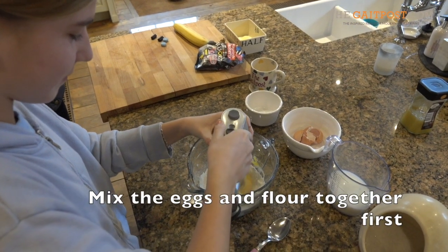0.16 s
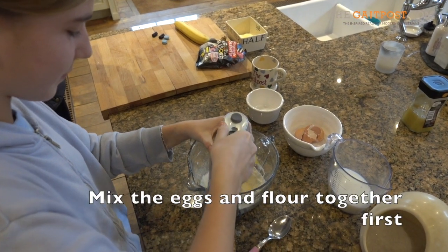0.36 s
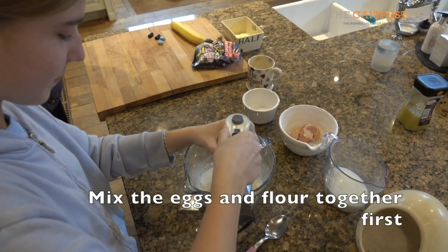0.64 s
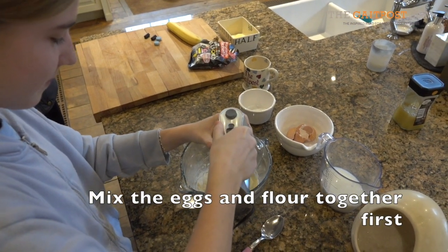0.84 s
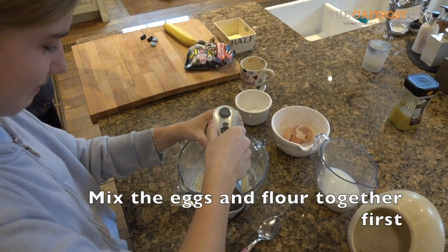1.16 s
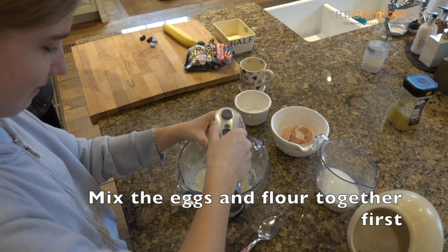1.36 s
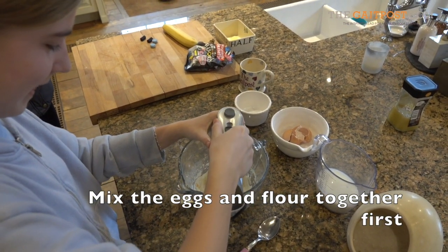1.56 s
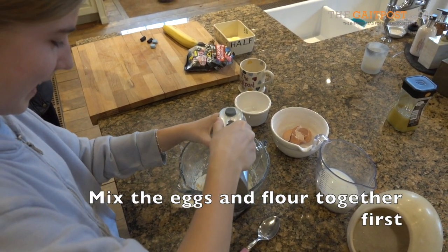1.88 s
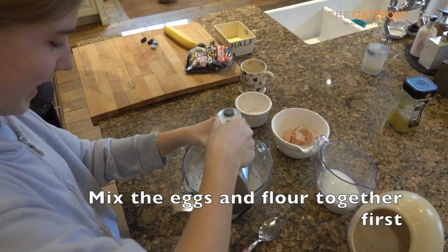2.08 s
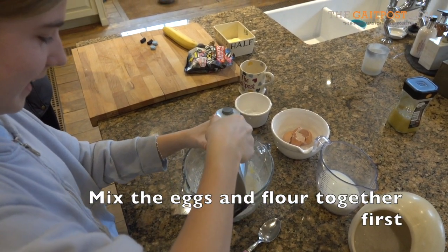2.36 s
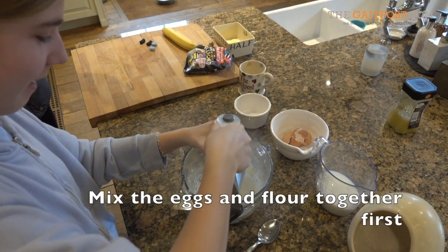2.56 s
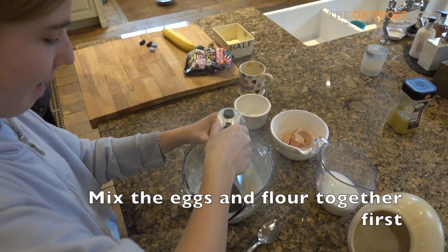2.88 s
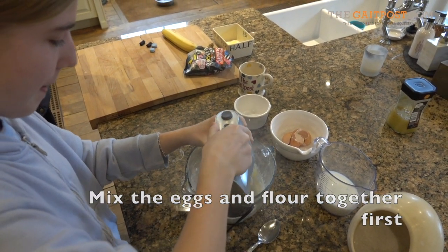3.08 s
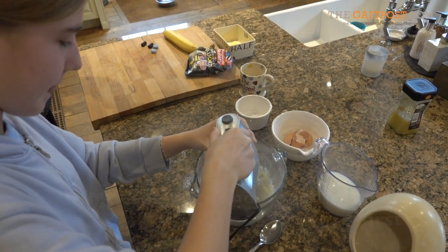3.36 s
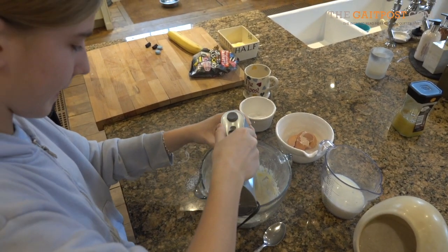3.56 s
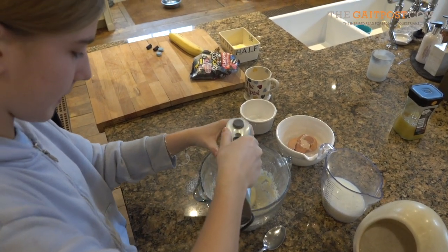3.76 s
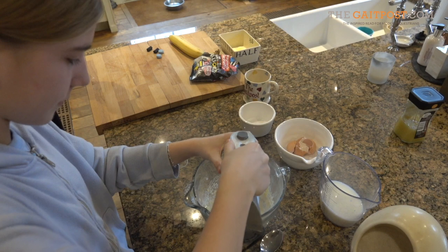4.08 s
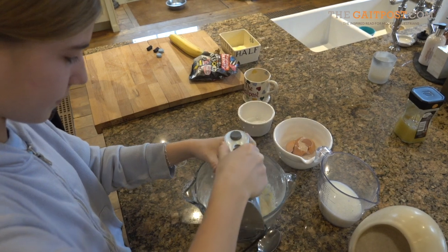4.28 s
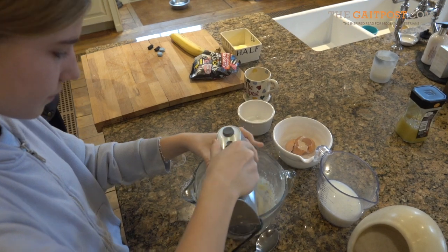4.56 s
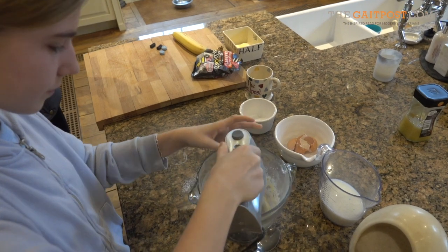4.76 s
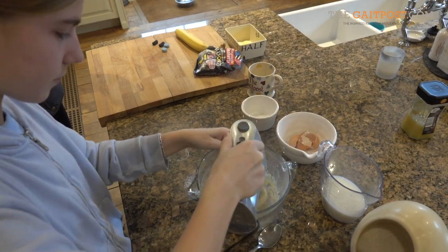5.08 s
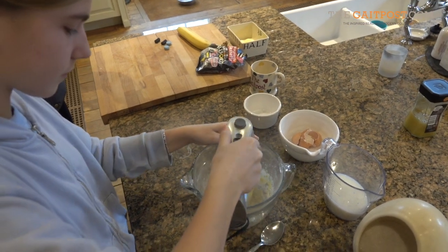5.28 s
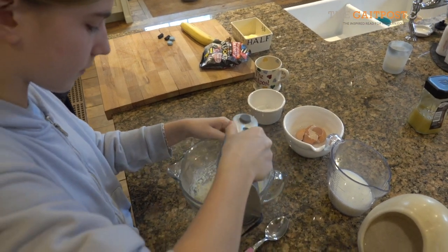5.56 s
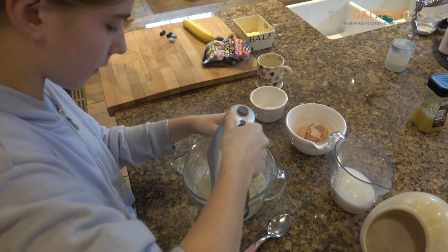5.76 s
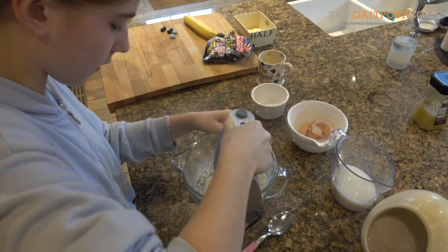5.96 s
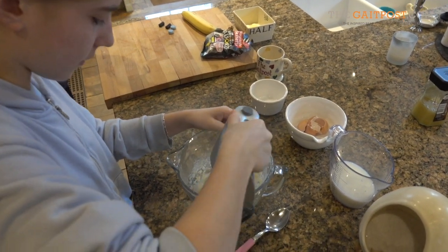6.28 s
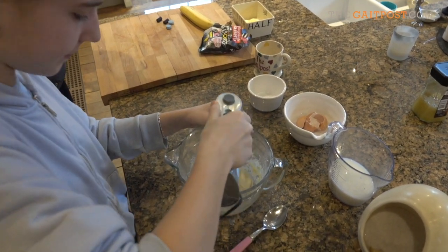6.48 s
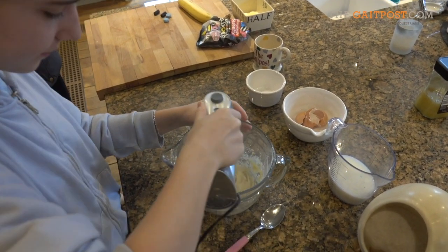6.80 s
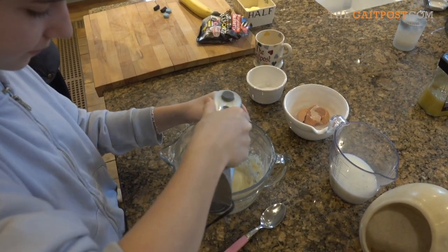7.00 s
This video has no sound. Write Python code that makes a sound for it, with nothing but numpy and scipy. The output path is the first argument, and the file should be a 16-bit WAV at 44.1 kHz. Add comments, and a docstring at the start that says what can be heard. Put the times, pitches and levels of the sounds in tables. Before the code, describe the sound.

Close, buzzing kitchen mixer with bright glass clatter and scraping at first, then a lower, duller motor drone with scattered clinks.

```python
"""In a hard-walled kitchen, close to the microphone, a mains-driven hand mixer works eggs and flour in a
glass bowl on a stone counter, slowing as the batter thickens. Its commutator whines, as a stack of tones, over
the filtered noise of fan and gears. Whenever the steel beaters touch the wall their blades rattle and scrape,
ring the glass and shake the housing: bursts of noise at the blade rate drive resonances. The walls answer."""
import sys
import numpy as np
from scipy import signal
from scipy.fft import rfft, irfft, next_fast_len
from scipy.io import wavfile
from scipy.ndimage import map_coordinates

SR = 44100
rng = np.random.default_rng(int(sys.argv[2]) if len(sys.argv) > 2 else 0)


def to_wav(s):
    """Save 16-bit WAV."""
    ch = np.atleast_2d(s).T  # columns
    pcm = np.round(np.clip(ch, -1, 1) * 32767)  # PCM
    wavfile.write(sys.argv[1], SR, pcm.astype(np.int16))


N = 314433  # samples


def amp(db):
    """Gain of a level in dB."""
    return 10 ** (np.asarray(db) / 20)


def unit(x):
    """x scaled to rms 1."""
    return x / np.sqrt(np.mean(x ** 2) + 1e-20)


def along(points, hz):
    """(Hz, value) points read on a log frequency axis."""
    f, v = np.transpose(points)
    return np.interp(np.log(hz + 1), np.log(f + 1), v)


def curves(rows):
    """One value per sample for each column after the time."""
    s, *cols = np.transpose(rows)
    return [np.interp(np.arange(N) / SR, s, c) for c in cols]


def wobble(rate):
    """A smooth random curve, rate knots a second."""
    knots = rng.standard_normal(int(N * rate / SR) + 4)
    return map_coordinates(knots, [np.arange(N) * rate / SR])


def filtered(x, response):
    """x times a complex response of frequency."""
    m = next_fast_len(N + SR // 2)
    return irfft(rfft(x, m) * response(np.fft.rfftfreq(m, 1 / SR)), m)[..., :N]


def modes(table):
    """Response of a set of resonances (Hz, width Hz, dB), scaled so that white noise keeps its rms."""
    def ring(f):
        return sum((-1) ** k * amp(db) * 1j * f * width / (hz * hz - f * f + 1j * f * width)
                   for k, (hz, width, db) in enumerate(table))
    return lambda f: ring(f) / np.sqrt(np.mean(abs(ring(f)) ** 2))


RIPPLE_HZ = 100  # mains ripple
BARS_PER_BLADE = 61  # commutator bars that pass for each blade pass
# The motor through the take: start_s, pitch_hz (commutator bars a second),
# whine_level_db (before the housing), rush_level_db (fan and gears, before the shell adds its ring)
MOTOR = [(0, 3826, -47, -44), (0.15, 3788, -53.5, -46.5), (0.359, 3880, -51, -43.5),
         (0.551, 3925, -59, -44), (0.899, 3952, -54, -46.5), (1.052, 4062, -55, -45),
         (1.35, 3977, -59, -42.5), (1.6, 4034, -51, -45.5), (1.75, 4032, -59, -45.5),
         (2.101, 3914, -49, -38.5), (2.55, 4038, -59, -42), (2.719, 4120, -56, -45.5),
         (2.86, 4013, -50.5, -46.5), (2.919, 3946, -55.5, -47), (3.149, 3776, -49, -43.5),
         (3.45, 3870, -56, -41), (3.619, 3847, -47.5, -49.5), (3.918, 3697, -54, -42),
         (4.24, 3612, -54.5, -46.5), (4.56, 3570, -56, -53), (4.76, 3300, -53.5, -50),
         (5.031, 3287, -52.5, -50.5), (5.199, 3090, -53.5, -51), (5.4, 3033, -56.5, -50),
         (5.599, 3073, -59, -53), (5.9, 3130, -61.5, -49.5), (6.01, 3295, -53, -47.5),
         (6.15, 3075, -58, -51.5), (6.3, 2960, -56.5, -50), (6.57, 2853, -57.5, -48.5),
         (6.76, 2928, -57, -52.5), (7.01, 2753, -59.5, -49), (7.13, 2811, -54, -58)]


def bars():
    """Running count of commutator bars under the brushes: the pitch summed over time."""
    return np.cumsum(curves(MOTOR)[0]) / SR


def light():
    """1 while the motor runs free, 0 once the thick batter holds it back, read from its pitch."""
    return np.clip((curves(MOTOR)[0] - 3550) / 300, 0, 1)


def ripple():
    """The mains ripple as a sine."""
    return np.sin(2 * np.pi * RIPPLE_HZ * np.arange(N) / SR)


# What the housing lets out of the whine: pitch_hz, level_db
HOUSING = [(2650, 6), (2790, 11), (2890, 11), (3050, 5.5), (3250, -6.5), (3600, 2), (3800, -8.5), (4100, 2),
           (6000, -6.5), (7200, -11), (8100, -7), (10000, -8.5), (11000, -11.5), (12000, -10.5),
           (13300, -20), (14300, -14), (15800, -21)]


def whine(unsteady=0.7, fuzz=0.55, flutter_db=2.5):
    """Commutator tone and overtones, phase-blurred by brush chatter; the mains ripple adds sidebands."""
    level_db = curves(MOTOR)[1]
    phase = 2 * np.pi * bars() + unsteady * wobble(25)  # radians, as are the two swings below
    mains = 0.85 * ripple()
    tones = 0
    for k in range(1, 6):
        level = amp(level_db + flutter_db * wobble(30)) * np.sqrt(2)
        chatter = fuzz * np.sqrt(k) * wobble(160)
        tones = tones + level * np.sin(k * phase + mains + chatter)
    return filtered(tones, lambda f: amp(along(HOUSING, f)))


# Colour of the rush running light: pitch_hz, level_db (per Hz, relative)
RUSH_FAST = [(100, -45.5), (345, -18.5), (520, -2.5), (680, -9.5), (1070, -4.5), (1570, -4.5), (1850, -6),
             (2180, -1.5), (3000, -6.5), (4000, -10), (7000, -12), (10000, -21), (15800, -26)]
# Colour of the rush under load: pitch_hz, level_db (per Hz, relative)
RUSH_SLOW = [(100, -31), (400, -20.5), (520, 1), (750, -25.5), (960, -2), (1300, -4.5), (1900, -1),
             (2160, 2), (2600, -2), (2900, -8), (5000, -14.5), (8200, -22), (15800, -45)]
# Ring of the motor shell: pitch_hz, level_db (under load, relative to the rush; each mode flickers)
SHELL = [(1900, -16), (2130, -9), (2250, -12)]


def rush():
    """Fan air and gear mesh: rough noise that throbs with the mains, dulls under load and rings in the shell."""
    throb = 1 + 0.054 * ripple()
    teeth = throb * amp(1.24 * wobble(250)) * rng.standard_normal((2, N))
    fast, slow = filtered(teeth, lambda hz: amp([along(RUSH_FAST, hz), along(RUSH_SLOW, hz)]))
    free = light()
    air = np.sqrt(free) * unit(fast) + np.sqrt(1 - free) * unit(slow)
    shell = 0
    for hz, db in SHELL:
        flicker = amp(db - 6 * free + 3 * wobble(11))
        shell = shell + flicker * filtered(teeth[0], modes([(hz, 60, 0)]))
    return amp(curves(MOTOR)[2] + 1.3 * wobble(12)) * (air + shell)


RISE_DB, LET_GO_DB_PER_S = 16.5, 101  # climb of the scrape over the rise; its fall afterwards
HUM_SWINGS, GLASS_SWINGS = 1.05, 1.88  # hum and ring climb and fall more steeply than the scrape
OFF_SPOT_DB = 15  # loss of a glass family one spot away
CHURN_DB, CHURN_FREE_DB = -57.5, 3.5  # beaters off the wall in thick batter; gain while it is thin
CHURN_HUM_DB, CHURN_GLASS_DB = -24, -7.5  # relative to the churning
# Sweeps of the beaters along the wall: start_s (full contact), hold_s, rise_s (before the start),
# scrape_level_db, hum_level_db, glass_level_db (all before the trims at each sound),
# first_spot and last_spot on the wall over the hold (0-2, the family of glass modes woken)
SWEEPS = [(0, 0.0026, 0.035, -40.5, -52, -32.5, 0.88, 2),
          (0.456, 0.098, 0.38, -43.5, -40.5, -36.5, 0.8, 0.49),
          (0.697, 0.26, 0.19, -42.5, -43.5, -48, 0.57, 0.02),
          (1.104, 0.065, 0.19, -41, -57, -33, 1.75, 1.5), (1.268, 0.19, 0.15, -47, -43, -39, 1.15, 0.98),
          (2.076, 0.4, 0.27, -37.5, -41.5, -32.5, 1.3, 1.17),
          (2.522, 0.046, .1, -45.5, -38, -37.5, 0.95, 0.4), (2.882, 0.24, 0.016, -49, -58, -46.5, 0.7, 1.2),
          (3.204, 0.25, 0.38, -39, -42, -35.5, 0.97, 1.3), (3.94, .17, 0.27, -40, -40, -28.5, 0.77, 0.5),
          (4.74, 0.2, 0.077, -51.5, -63, -48.5, 1.1, 1.53),
          (5.131, 0.0093, 0.03, -45, -49.5, -58, 1.67, 1.6),
          (5.44, 0.12, 0.088, -43, -42.5, -42.5, 0.86, 0.085),
          (5.881, 0.066, 0.13, -38.5, -39, -27.5, 0.59, 0.55),
          (6.255, 0.073, 0.084, -41.5, -47.5, -38.5, 0.83, 0.31),
          (6.375, 0.014, 0.084, -53.5, -49, -55, 0.27, 0.3),
          (6.681, .01, 0.21, -44, -45.5, -44, 0.28, 0.11),
          (7.12, 0.018, 0.27, -40.5, -40.5, -53, 0.81, 1.05)]


def contact():
    """Levels in dB of scrape, hum and three glass families: sweeps climb, hold and let go over the churning."""
    t = np.arange(0, N + 64, 64) / SR
    thin = np.interp(t, np.arange(N) / SR, light())
    s, hold, rise, scrape_db, hum_db, glass_db, first, last = np.transpose(SWEEPS)[..., None]
    climb_db = RISE_DB * np.maximum(s - t, 0) / rise
    fall_db = LET_GO_DB_PER_S * np.maximum(t - s - hold, 0)
    short_db = climb_db + fall_db  # how far each sweep is below full contact
    spot = first + (last - first) * np.clip((t - s) / hold, 0, 1)
    churn_db = CHURN_DB + CHURN_FREE_DB * thin

    def loudest(db, under_db):
        return np.maximum(db.max(axis=0), under_db)

    rows = [t, loudest(scrape_db - short_db, churn_db),
            loudest(hum_db - HUM_SWINGS * short_db, churn_db + CHURN_HUM_DB)]
    for k in range(3):
        sweep_db = glass_db - GLASS_SWINGS * short_db - OFF_SPOT_DB * abs(spot - k)
        rows.append(loudest(sweep_db, churn_db + CHURN_GLASS_DB - OFF_SPOT_DB * abs(1 - k) / 2))
    return curves(np.transpose(rows))


def blades(scatter_db, life_s, rub):
    """Force on the wall: a noise burst of uneven size at each blade pass over a steady rub, rms 1."""
    passes = bars() / BARS_PER_BLADE
    sizes = amp(scatter_db * np.tanh(rng.standard_normal(int(passes[-1]) + 1)))
    ticks = np.diff(np.floor(passes), prepend=0) * sizes[passes.astype(int)]
    burst = unit(signal.lfilter([1], [1, -np.exp(-1 / (life_s * SR))], ticks))
    return unit((burst + rub) * rng.standard_normal(N))


# Colour of the scrape: pitch_hz, level_db (per Hz, relative)
SCRAPE_COLOUR = [(35, -95), (60, -95), (261, -11), (604, -1.5), (780, -11), (1890, -2.5), (2180, -16),
                 (3090, -11.5), (5040, -14), (6360, -15.5), (7150, -14), (10100, -17.5), (15800, -25)]


def scrape(grind, scrape_db):
    """Steel grinding on the wall: the blade force, coloured and levelled by the contact."""
    return amp(scrape_db - 6.5) * unit(filtered(grind, lambda hz: amp(along(SCRAPE_COLOUR, hz))))


def rumble(grind, scrape_db):
    """The bowl rumbles on the counter, one low resonance, until the batter damps it."""
    return amp(scrape_db - 23) * light() * filtered(grind, modes([(330, 70, 0)]))


HUM_OFF_DB_PER_KHZ = 29.5  # loss of a mode away from its motor pitch
HUM_FLICKER_DB = 2  # each mode wavers by up to this
# Low modes of the loaded bowl, sinking as the batter thickens:
# pitch_hz, width_hz, level_db (relative), motor_pitch_hz (where the mode sounds best)
HUM = [(494, 24, -1.5, 2850), (526, 24, -2, 3100), (578, 26, -3, 3600), (628, 16, -3.5, 3950)]


def hum(grind, hum_db):
    """The loaded bowl hums: each low mode takes up the grinding most near its own motor pitch."""
    motor_hz = curves(MOTOR)[0]
    total = 0
    for hz, width, db, best in HUM:
        off_db = HUM_OFF_DB_PER_KHZ * abs(motor_hz - best) / 1000
        level = amp(hum_db + db - off_db + HUM_FLICKER_DB * np.tanh(wobble(13)))
        # the second factor is a gentle low cut at the mode
        total = total + filtered(level * grind, lambda f: modes([(hz, width, 0)])(f) * 1j * f / (1j * f + hz))
    return total


MUFFLED = 2.6  # thick batter widens the glass modes under a blow by this factor
# Glass modes in three families, each woken from another part of the wall:
# pitch_hz, width_hz (in thin batter), level_db (relative)
GLASS = [
    [(5642, 35, -4), (5762, 22, 0), (2888, 30, -12), (8187, 30, -9), (8570, 20, -10)],
    [(6135, 30, -4), (6210, 35, -5), (6390, 35, -5), (6452, 32, -3), (6516, 14, 0), (6720, 25, -5),
     (2620, 60, -11), (4540, 160, -17), (6300, 500, -12), (9020, 54, -15), (9470, 120, -17),
     (10150, 120, -17)],
    [(7346, 14, 0), (7498, 45, -4), (7697, 26, -5), (11340, 35, -9), (7990, 45, -10)],
]


def glass(force, ring_db, struck):
    """The bowl rings: rubbing and blows drive its modes, and thick batter muffles the ring of the blows."""
    clear = 0.21 + 0.92 * light()
    total = 0
    for level, blow, family in zip(amp(ring_db), struck, GLASS):
        open_drive = amp(-5.0) * level * force + amp(-2.0) * clear * blow
        muffled_drive = amp(0.5) * (1 - clear) * blow
        total = total + filtered(open_drive, modes(family))
        total = total + filtered(muffled_drive, modes(np.array(family) * [1, MUFFLED, 1]))
    return total


BLOW_OFF_SPOT_DB = 20.5  # loss of a glass family one spot away, before the three are evened to one power
DRAG_S, DRAG_DB = 0.027, -16  # the blade drags on after a blow and draws out the thud
# Hard blade blows: start_s, blow_level_db (peak force), spot on the wall
# (0-2 = glass family, beyond 2 = past the last), thud_level_db (peak force of the thud, before the drag)
KNOCKS = [(.012, -23.5, 1.44, -37.5), (0.1634, -29, 1.15, -40), (0.2257, -24.5, 1.2, -38),
          (0.3014, -33, 1.2, -41), (0.429, -37, 1, -38.5), (0.474, -25.5, 1.2, -37),
          (0.6628, -32, 1.4, -46), (0.837, -34, 1.3, -33), (0.894, -31, 1.36, -34),
          (0.962, -29.5, 1.54, -34), (1.0208, -27.5, 1.6, -33.5), (1.079, -20.5, 1.64, -36.5),
          (1.094, -23, 1.7, -34), (1.252, -24, 0.9, -32), (1.311, -22, 1.27, -30),
          (1.3698, -21.5, 0.96, -38), (1.3848, -22.5, 1.2, -40), (1.447, -26, 1.2, -35),
          (2.251, -26, 1.54, -38.5), (2.313, -19.5, 1.3, -34), (2.4287, -17, 0.93, -37),
          (2.8772, -33, 1, -35.5), (3.0114, -29, 1.44, -39), (3.073, -22, 1.7, -37.5),
          (3.139, -27.5, 1.51, -36.5), (3.202, -23, 1.47, -36), (3.252, -27, 1.2, -37),
          (3.2637, -23.5, 1.5, -46), (3.3453, -26, 1.4, -33), (3.503, -14, 1.57, -43),
          (3.5103, -35, 1.41, -44.5), (3.7903, -28.5, 1.22, -43), (3.8537, -23.5, 0.63, -36),
          (4.734, -37, 1.6, -39), (4.794, -34.5, 1.09, -41.5), (5.1234, -45, 1.1, -47),
          (5.1415, -28.5, 1.28, -31.5), (5.151, -35, 1.21, -52), (5.1613, -37, 2.5, -53),
          (5.171, -42, 2.5, -53), (5.36, -41, 0.82, -44), (5.379, -36, 0.84, -40.5),
          (5.4004, -36, 0.87, -56), (5.42, -28.5, 0.72, -44), (5.4422, -47, 0.92, -45),
          (5.463, -43, 0.46, -42), (5.485, -28.5, 0.41, -40), (5.7997, -31, 0.69, -38),
          (5.878, -35, 0.86, -35), (5.9552, -22.5, 0.32, -36), (6.2209, -34, 1, -36),
          (6.24, -35.5, 1.05, -45), (6.2622, -37, 0.9, -37), (6.6451, -34.5, 0.54, -36.5),
          (6.9853, -38, 0.88, -38), (7.056, -28.5, 0.89, -35.5), (7.0983, -26.5, 0.88, -39)]


def knocks(life_s=0.0022, again_db=-6):
    """Force of the hard blows: bare, for the thud and for each glass family; the next two blades strike again."""
    s, db, spot, thud_db = np.transpose(KNOCKS)
    near = amp([-BLOW_OFF_SPOT_DB * abs(spot - k) for k in range(3)])
    sizes = np.vstack([amp([db, thud_db]), amp(db) * near / np.linalg.norm(near, axis=0)])
    times, hz, *_ = np.transpose(MOTOR)
    gap_s = BARS_PER_BLADE / np.interp(s, times, hz)
    scatter_db = 1.5 * rng.standard_normal((len(s), 3))
    scatter_db[:, 0] = 0  # only the repeats vary
    force = np.zeros((5, N + SR))
    for k in range(3):
        hits = np.round((s + k * gap_s) * SR).astype(int)
        force[:, hits] += sizes * amp(k * k * again_db + scatter_db[:, k])

    def fading(life):
        return signal.lfilter([1], [1, -np.exp(-1 / (life * SR))], force[:, :N])

    is_thud = (np.arange(5) == 1)[:, None]
    drag = amp(DRAG_DB) * is_thud * fading(DRAG_S)
    return (fading(life_s) + drag) * np.sign(rng.standard_normal((5, N)))  # random signs make it noise


# Dull modes of bowl and housing: pitch_hz, width_hz, level_db (relative)
BODY = [(962, 52, 5), (1390, 245, 5), (2120, 830, 1), (4600, 1100, -5)]


def thud(force):
    """Blows shake bowl and housing, whose wide modes die fast; thin batter damps them 1 dB less."""
    return amp(1 * light()) * filtered(force, modes(BODY))


def crack(blow):
    """Bare click of a blow: its force kept between gentle slopes at 1500 and 9000 Hz."""
    return amp(-14) * filtered(blow, lambda hz: 1j * hz / (1j * hz + 1500) * 9000 / (1j * hz + 9000))


def beaters():
    """The blades scrape along the wall and knock on it, ring the glass and make the bowl hum."""
    scrape_db, hum_db, *ring_db = contact()
    blow, thud_force, *struck = knocks()
    force = blades(scatter_db=3, life_s=0.003, rub=0.7)
    grind = blades(scatter_db=6, life_s=0.004, rub=1)
    rubbed = scrape(grind, scrape_db) + rumble(grind, scrape_db) + hum(grind, hum_db)
    return rubbed + glass(force, ring_db, struck) + thud(thud_force) + crack(blow)


# Decay of the room: pitch_hz, t60_s
KITCHEN = [(300, 0.35), (3000, 0.34), (12000, 0.39)]


def kitchen(x):
    """Two unrelated answers of the walls: decaying noise in which each frequency dies at its own speed."""
    hz, t, z = signal.stft(rng.standard_normal((2, SR // 2)), SR, nperseg=256)
    decay = amp(-60 * t / along(KITCHEN, hz)[:, None])
    tail = signal.istft(z * decay, SR, nperseg=256)[1]
    late = np.pad(x, (200, 0))[None]  # the walls answer 200 samples after the direct sound
    return signal.fftconvolve(late, tail / np.linalg.norm(tail[0]), axes=1)[:, :N]


# Colour of the faint room tone: pitch_hz, level_db (per Hz, relative)
ROOM_TONE = [(25, 3), (60, 11), (150, -24), (300, -6), (600, -56)]


def room_tone():
    """Two unrelated coloured noises, for the middle and for the sides, each of rms 1."""
    noise = rng.standard_normal((2, N))
    low, wide = filtered(noise, lambda hz: amp(along(ROOM_TONE, hz)))
    return unit(low), unit(wide)


# Spread of the walls' answer to the sides: pitch_hz, level_db
WIDTH = [(60, -12), (110, -11), (200, -40), (380, -14.5), (600, -18), (1290, -18.5), (2380, -10.5),
         (4400, -8), (8120, -6), (15000, -11.5)]


def scene():
    """The mixer sits close and near the middle, a touch right; the walls spread it left and right."""
    mixer = whine() + rush() + beaters()
    ahead, across = kitchen(mixer)
    low, wide = room_tone()
    mid = mixer + amp(-6.5) * ahead + amp(-85.0) * low
    side = filtered(across, lambda hz: amp(along(WIDTH, hz))) + amp(-96) * wide
    return np.array([mid + side, mid - side]) * amp([[-0.3], [0.3]])


def record(dry):
    """The microphone's recorder cuts the deep bass below 200 Hz and keeps nothing from 15830 Hz up."""
    return filtered(dry, lambda hz: (hz < 15830) * (1j * hz / (1j * hz + 200)) ** 2)


dry = scene()
out = record(dry)
to_wav(out)
```